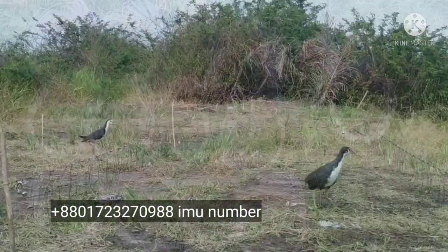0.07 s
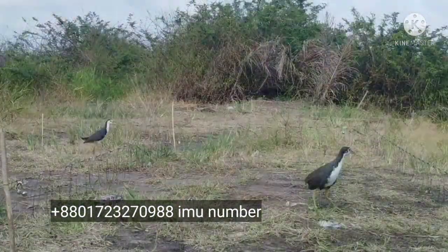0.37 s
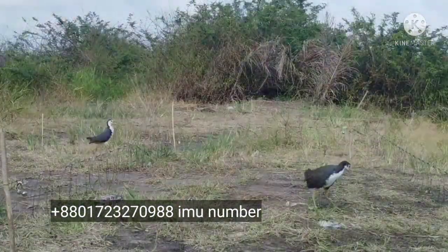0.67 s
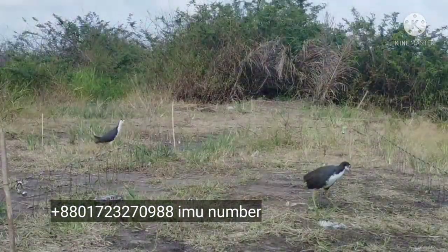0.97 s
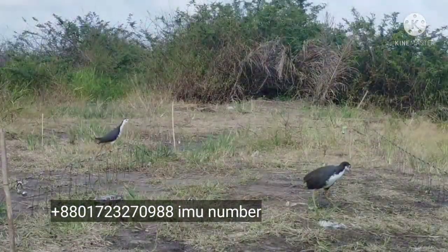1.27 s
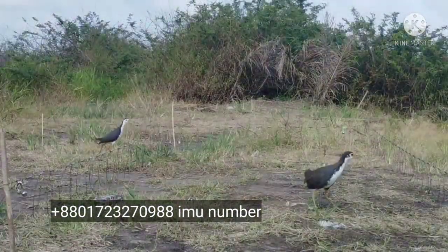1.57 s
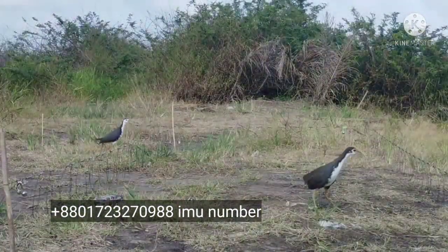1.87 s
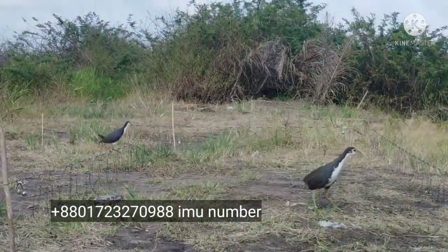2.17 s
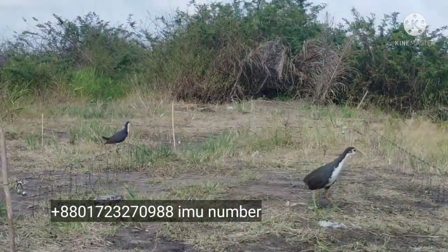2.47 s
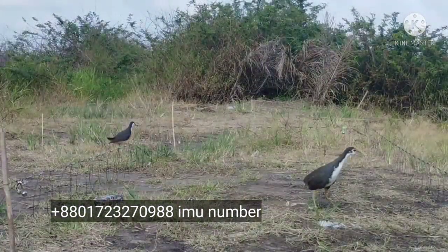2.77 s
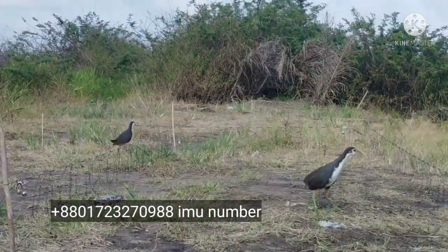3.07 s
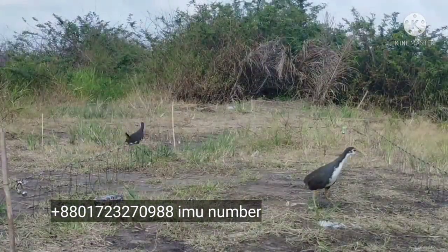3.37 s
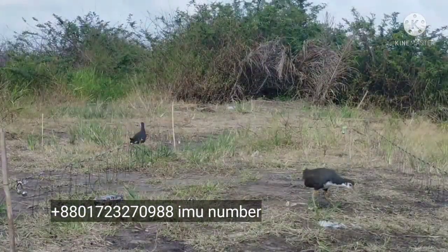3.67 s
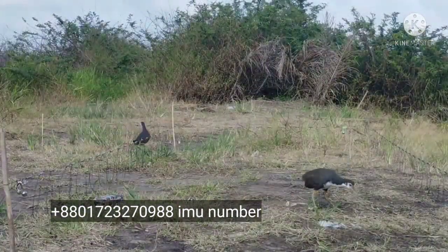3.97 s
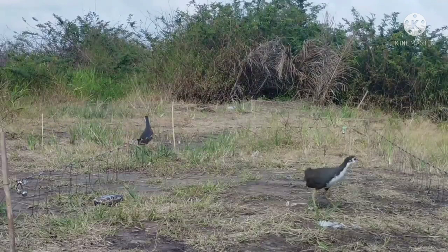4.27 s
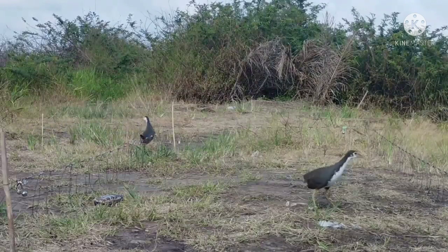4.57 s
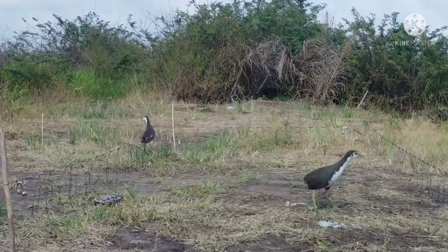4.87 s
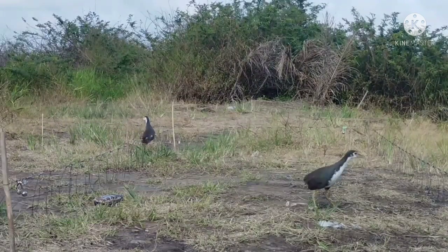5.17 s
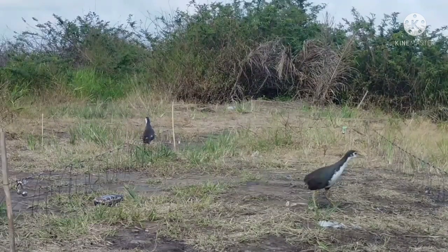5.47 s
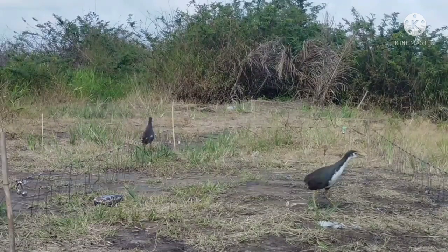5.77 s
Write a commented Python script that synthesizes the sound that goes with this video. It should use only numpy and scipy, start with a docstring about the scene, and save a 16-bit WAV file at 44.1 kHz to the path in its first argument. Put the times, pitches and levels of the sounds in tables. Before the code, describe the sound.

Harsh, distorted waterhen calls repeat evenly, mixed with runs of short croaks, soft answering notes and a faint outdoor hiss.

```python
"""Waterhen in a grassy field.

A near-pure lure call, played over and over through a loudspeaker, starts hoarse, sweeps up and repeats evenly,
so loud that it overloads the microphone; bushes and grass echo it. Runs of short croaks, pulses and breath
ringing in the throat, and a few soft answering calls fall between the notes. Small birds whistle far off, over
a faint hiss and a low rumble of wind. A dull rustle sets in near the end."""
import sys
import numpy as np
from scipy import signal
from scipy.fft import rfft, irfft
from scipy.io import wavfile

SR = 44100
rng = np.random.default_rng(int(sys.argv[2]) if len(sys.argv) > 2 else 0)


def unload_wav(signal):
    """Save mono or channel-first audio to the path in sys.argv[1] as 16-bit WAV at rate SR, clipped to [-1, 1]."""
    wavfile.write(
        sys.argv[1],
        SR,
        np.round(np.clip(np.atleast_2d(signal).T, -1, 1) * 32767).astype(np.int16),
    )


N = 264688


def from_db(db):
    return 10 ** (np.asarray(db) / 20)


def unit_rms(x):
    return x / np.sqrt(np.mean(x ** 2) + 1e-20)


def ramp(t, length):
    """Linear rise from 0 to 1, then hold."""
    return np.clip(t / length, 0, 1)


def arch(t, length):
    """Half-sine swell and fade."""
    return np.sin(np.pi * ramp(t, length))


def between(share, start, end):
    return start + share * (end - start)


def phase_of(hz):
    return 2 * np.pi * np.cumsum(hz) / SR


def add(out, start_s, sound):
    i = int(np.clip(round(start_s * SR), 0, N))
    out[i:i + len(sound)] += sound[:N - i]


def low_pass(x, hz, order=2):
    return signal.sosfilt(signal.butter(order, hz, fs=SR, output="sos"), x)


def resonance(x, hz, width_hz):
    """Two-pole band-pass, peak gain 1."""
    r = np.exp(-np.pi * width_hz / SR)
    feedback = [1, -2 * r * np.cos(2 * np.pi * hz / SR), r * r]
    return signal.lfilter(np.array([1, 0, -1]) * (1 - r * r) / 2, feedback, x)


def noise(spectrum, size):
    """Unit-RMS noise shaped by (Hz, dB) rows."""
    hz, db = np.transpose(spectrum)
    bins_hz = np.maximum(np.fft.rfftfreq(size, 1 / SR), 1)
    gain = from_db(np.interp(np.log(bins_hz), np.log(hz), db))
    return unit_rms(irfft(rfft(rng.standard_normal(size)) * gain, size))


def wobble(hz, size):
    """Unit-RMS random wavering, low-passed at hz."""
    return unit_rms(low_pass(rng.standard_normal(size + SR // 4), hz)[SR // 4:])


def puff(hz, width_hz, size):
    """Air rushing through one resonance, treble cut, unit RMS."""
    ringing = resonance(resonance(rng.standard_normal(size), hz, width_hz), hz, width_hz)
    return unit_rms(low_pass(ringing, hz + width_hz, order=4))


def field_hiss(t):
    """Faint broadband hiss, drifting in level."""
    # Each row: frequency in Hz, relative density in dB.
    spectrum = [(100, -50), (200, -55), (275, -4), (340, -19.5), (480, -10), (700, -0.5), (1000, -9),
                (1300, -10), (1600, -7), (2200, -14.5), (3000, -18), (4200, -19), (5500, -22.5),
                (7400, -29.5), (9000, -24), (11000, -30.5), (13000, -33), (15500, -58)]
    # Each row: time in seconds, level in dB.
    levels = [(.08, -75), (.28, -59.5), (.45, -67), (1.0, -51.5), (2.4, -52.5), (3.2, -45), (4.5, -52.5),
              (6, -50.5)]
    return from_db(np.interp(t, *np.transpose(levels))) * noise(spectrum, N)


def wind(t, gust_db=4.5, gust_hz=12.3):
    """Low, gusty rumble."""
    # Each row: frequency in Hz, relative density in dB.
    spectrum = [(15, -8), (30, 15), (50, -5.5), (75, -9), (110, -12), (150, -18.5), (250, -36.5)]
    # Each row: time in seconds, level before gusts in dB.
    levels = [(0, -66), (.75, -50), (1.2, -58), (2.62, -48.5), (2.85, -58.5), (5.6, -63), (5.8, -48.5),
              (6, -39)]
    db = np.interp(t, *np.transpose(levels)) + gust_db * wobble(gust_hz, N)
    return from_db(db) * noise(spectrum, N)


def sliding_hiss(half_width_hz=420):
    """Narrow hisses swell and sink in pitch."""
    # Each row: start in seconds, length in seconds, first and last centre in Hz, peak level in dB.
    slides = [(0.106, 0.34, 3400, 3070, -63), (0.371, 0.33, 2180, 1680, -61),
              (0.504, 0.48, 3640, 1967, -54), (1.108, 0.43, 2484, 1870, -54), (1.593, .42, 2685, 2070, -52),
              (2.009, 1, 2230, 1853, -58)]
    out, t = np.zeros(N), np.arange(SR) / SR
    for start_s, length_s, first_hz, last_hz, db in slides:
        phase = phase_of(np.interp(t, [0, length_s], [first_hz, last_hz]))
        hiss = wobble(half_width_hz, SR) * np.sin(phase) + wobble(half_width_hz, SR) * np.cos(phase)
        add(out, start_s, from_db(db) * arch(t, length_s) * hiss)
    return out


def undertone(phase, upper_db):
    """Unequal alternate cycles put lines at 1/2 and 3/2 of the pitch."""
    return np.sin(phase / 2) + from_db(upper_db) * np.sin(1.5 * phase)


def answers(first_hz=854, second_hz=1112, jitter=0.025):
    """Soft calls: a throaty pop, a held pitch, then a step up that breaks to the octave below."""
    # Each row: start in seconds, level in dB.
    notes = [(.264, -43.5), (.733, -36), (1.288, -35.5), (1.835, -35.5), (3.999, -37), (5.089, -37)]
    length_s, attack_s, release_s, pop_s = 0.1, 0.0044, 0.01, 0.01
    step_at_s, step_s, step_db = 0.036, 0.0184, -2.5
    out, t = np.zeros(N), np.arange(SR // 8) / SR
    step = ramp(t - step_at_s, step_s)
    envelope = ramp(t, attack_s) * ramp(length_s - t, release_s) * from_db(step_db * step)
    for start_s, db in notes:
        phase = phase_of(between(step, first_hz, second_hz) * (1 + jitter * wobble(247, len(t))))
        tone = np.sin(phase) + step * undertone(phase, upper_db=-11)
        pop = from_db(-2) * np.exp(-t / pop_s) * puff(hz=650, width_hz=500, size=len(t))
        add(out, start_s, from_db(db) * envelope * (tone + pop))
    return out


def lingering_note(start_s=0.854, hz=990, level_db=-33, attack_s=0.011, decay_db_per_s=105):
    """A thin, fluttering tone dies away before the first loud call."""
    out, t = np.zeros(N), np.arange(SR // 3) / SR
    db = level_db - decay_db_per_s * t + 3 * wobble(41, len(t))
    phase = phase_of(hz * (1 + 0.024 * wobble(60, len(t))))
    add(out, start_s, from_db(db) * ramp(t, attack_s) * np.sin(phase))
    return out


def loud_calls(first_s=1.0911, period_s=0.43378, count=11):
    """One note, repeated: it starts low and hoarse, sweeps up, clears, sags and leaves a short ring."""
    # Each row: multiple of the pitch, level re the fundamental in dB.
    overtones = [(2, -23.5), (3, -26), (4, -28.5)]
    # Each row: frequency in Hz, relative density in dB.
    rasp_spectrum = [(100, -14.5), (400, -5), (750, 8), (1300, 10), (1800, -23), (2700, 4), (4000, -10.5),
                     (6000, -16.5), (15000, -30)]
    attack_s, settle_s, hold_s, ease_s, release_s = 0.001938, 0.00693, 0.096, 0.012, 0.0037
    rise_at_s, rise_s, swell_s = 0.0305, 0.04508, 0.018
    rattle_s, rattle_hz, doubling_at_s, doubling_width_s = 0.029, 179.7, 0.0572, 0.011
    size = SR // 5
    t = np.arange(size) / SR - attack_s
    since_s = np.maximum(t, 0)
    push = np.exp(-since_s / settle_s)
    hoarse = (1 - ramp(t - rise_at_s, rise_s)) ** 1.893
    doubling = np.exp(-((t - doubling_at_s) / doubling_width_s) ** 2)   # brief period doubling
    # Each catch of the throat pulls pitch and level down.
    catches = arch(t, rattle_s) * np.cos(np.pi * rattle_hz * (t - rattle_s / 2)) ** 8

    low_hz, top_hz, push_hz, catch_hz, sag_hz_per_s, jitter = 683.7, 1014.5, 124.7, 70.8, 2890, 0.028
    hz = between(hoarse, top_hz, low_hz) + push_hz * push - catch_hz * catches
    hz -= sag_hz_per_s * np.maximum(t - rise_at_s - rise_s, 0)
    phase = phase_of(hz * (1 + jitter * hoarse * wobble(200, size)))
    tone = np.sin(phase) + sum(from_db(db) * np.sin(k * phase) for k, db in overtones)
    tone += from_db(-6.5) * doubling * undertone(phase, upper_db=-3)

    level_db = between(ramp(t - rise_at_s, swell_s), -5.5, 6.5) + 7 * push - 8 * catches - 7 * doubling
    level_db -= 10 * ramp(t - hold_s + ease_s, ease_s)
    level_db += 1.5 * hoarse * wobble(230, size)
    gate = ramp(t + attack_s, 2 * attack_s) ** 3 * (1 - ramp(t - hold_s, release_s))
    rasp_gain = from_db(between(hoarse, -26, -15.5)) + from_db(-8) * np.exp(-since_s / 0.00097)
    call = from_db(level_db) * gate * (tone + rasp_gain * noise(rasp_spectrum, size))

    ring_hz, decay_db_per_s = 983.9, 566
    after_s = np.maximum(t - hold_s - release_s / 2, 0)
    ring_db = -5.5 - decay_db_per_s * after_s + 2 * wobble(150, size)
    ring = np.sin(phase_of(ring_hz * (1 + 0.015 * wobble(145, size))))
    ring += from_db(-23) * noise(rasp_spectrum, size)
    call += from_db(ring_db) * ramp(after_s, release_s) * ring

    out = np.zeros(N)
    for k in range(count):
        add(out, first_s + k * period_s - attack_s, call)
    return out


def bushes(x, top_hz=2200):
    """A few separate dull echoes."""
    # Each row: delay in seconds, gain in dB.
    echoes = [(0.0513, -26), (.085, -33), (.138, -60), (.172, -43.5), (.235, -58), (.30, -82)]
    out, dull = np.zeros(N), low_pass(x, top_hz)
    for delay_s, db in echoes:
        add(out, delay_s, from_db(db) * dull)
    return out


def scatter(x, gain_db, t60_s, top_hz, build_s=0.0058):
    """Grass and leaves return a dense, dying tail."""
    t = np.arange(SR) / SR
    tail = low_pass(rng.standard_normal(SR), top_hz) * from_db(-60 * t / t60_s) * ramp(t, build_s)
    return from_db(gain_db) * signal.fftconvolve(x, tail / np.linalg.norm(tail))[:N]


def across_field(calls, leaf_hz=3900, leaf_width_hz=900):
    """Each call's clear top carries and lingers; its fourth harmonic rings on briefly."""
    carried = resonance(calls, hz=1000, width_hz=260)
    bright = resonance(resonance(calls, leaf_hz, leaf_width_hz), leaf_hz, leaf_width_hz)
    out = calls + bushes(carried) + scatter(carried, gain_db=-37, t60_s=0.72, top_hz=3050)
    out += scatter(bright, gain_db=-15, t60_s=0.22, top_hz=6000)
    treble = out - low_pass(out, 3500)
    return out + scatter(treble, gain_db=-31, t60_s=0.16, top_hz=14000)   # splash off the grass


def croaks(easy_hz=656, strained_hz=735, jitter=0.13, shimmer=0.76, breath=0.86, rasp_top_hz=5600):
    """A snap, then a rising note: unsteady tone, pulses and gated air ringing in the throat, a grunt."""
    # Each row: start in seconds, length in seconds, then tone, octave and rasp levels in dB.
    notes = [(2.552, .018, -28.5, -34.5, -41.5), (2.601, 0.022, -25, -30.5, -35.5),
             (2.662, 0.016, -23, -31, -36.5), (2.744, .026, -27.5, -30, -31.5),
             (2.918, .018, -23, -23, -14.5), (2.996, 0.023, -24, -27, -13), (3.077, .016, -22, -19, -12),
             (3.165, 0.0223, -24, -24, -12), (3.237, 0.019, -24, -19.5, -12.5),
             (3.402, .012, -22.5, -23, -12.5), (3.5028, 0.028, -23, -26, -18.5),
             (3.572, .029, -22.5, -26.5, -23), (3.919, 0.025, -30.5, -36.5, -42),
             (5.25, 0.032, -18, -49, -70), (5.309, 0.034, -19.5, -44, -70), (5.37, 0.036, -20.5, -49, -71),
             (5.67, 0.028, -35, -32, -48.5), (5.719, 0.0254, -27, -22, -57),
             (5.781, 0.0262, -28, -23.5, -68), (5.8702, 0.0219, -8, -19.5, -35),
             (5.934, 0.026, -6.5, -18, -30), (5.998, 0.042, 0.5, -9, -20.5)]
    # Throat resonances. Each row: centre in Hz, width in Hz, relative gain in dB.
    throat = [(933, 1300, -5), (1430, 530, 1), (2440, 470, -4.5), (3040, 200, 6.5), (3840, 310, -5),
              (4270, 170, -7.5), (5490, 130, -10.5)]
    size = SR // 12
    out, t = np.zeros(N), np.arange(size) / SR
    for start_s, length_s, tone_db, octave_db, rasp_db in notes:
        progress = t / length_s
        snap = from_db(3.5) * ramp(progress, 0.072) * np.exp(-(progress / 0.3) ** 2)
        envelope = snap + arch(progress - 0.28, 0.77)
        # Raspy croaks are higher, loud ones rougher.
        loud_db = max(tone_db, octave_db, rasp_db)
        rough = np.interp(loud_db, [-21.5, -10], [0.3, 0.73])
        base_hz = np.interp(rasp_db, [-42, -11], [easy_hz, strained_hz])
        pitch_hz = base_hz * (1 + 0.34 * abs(progress - 0.19))
        phase = phase_of(pitch_hz * (1 + jitter * rough * wobble(500, size)))
        tone = from_db(tone_db) * np.sin(phase) + from_db(octave_db) * np.sin(2 * phase)
        tone *= 1 + shimmer * rough * wobble(155, size)

        pulses = unit_rms(np.diff(phase // (2 * np.pi), prepend=0))
        source = pulses + breath * rough * (1 + np.cos(phase)) * rng.standard_normal(size)
        ringing = sum((-1) ** k * from_db(db) * resonance(source, hz, width_hz)
                      for k, (hz, width_hz, db) in enumerate(throat))
        rasp = from_db(rasp_db) * unit_rms(low_pass(ringing, rasp_top_hz, order=6))
        grunt_db = loud_db - 10 - 1.25 * max(-1 - loud_db, 0)   # heard only in the loudest croaks
        grunt = from_db(grunt_db) * puff(hz=235, width_hz=170, size=size)
        air = from_db(tone_db - 7) * rough * puff(hz=850, width_hz=750, size=size)
        add(out, start_s, envelope * (tone + air + rasp + grunt))
    return out


def among_stems(croaking):
    """Nearby stems throw back mostly the treble of the croaks."""
    crisp = resonance(croaking, hz=3500, width_hz=2200)
    near = scatter(crisp, gain_db=-10.5, t60_s=0.11, top_hz=8200)
    near += scatter(croaking, gain_db=-17, t60_s=0.15, top_hz=2960)
    return croaking + near + scatter(crisp, gain_db=-20, t60_s=1.0, top_hz=5050)


def whistles(waver=0.0029, glide_waver=0.41):
    """Thin, near-pure notes of far birds; the steep ones are buzzier."""
    # Each row: start in seconds, length in seconds, first and last pitch in Hz, peak level in dB.
    notes = [(2.591, 0.074, 6070, 6080, -52.5), (5.703, 0.058, 5130, 5130, -45.5),
             (5.707, 0.039, 5960, 5960, -52.5), (5.785, .037, 5000, 4240, -33.5),
             (5.806, .057, 6450, 6640, -54), (5.809, 0.061, 3780, 3250, -36.5),
             (5.822, .027, 7390, 7430, -50), (5.89, 0.031, 5350, 5380, -44.5)]
    out, t = np.zeros(N), np.arange(SR // 6) / SR
    for start_s, length_s, first_hz, last_hz, db in notes:
        jitter = waver + glide_waver * abs(np.log(last_hz / first_hz))
        hz = np.interp(t, [0, length_s], [first_hz, last_hz]) * (1 + jitter * wobble(400, len(t)))
        add(out, start_s, from_db(db) * arch(t, length_s) * np.sin(phase_of(hz)))
    return out


def rustle(t, start_s=5.65, attack_s=0.012, level_db=-37.5):
    """Dull noise behind the last croaks."""
    # Each row: frequency in Hz, relative density in dB.
    spectrum = [(60, 4), (150, -3.5), (250, -6.5), (400, -16.5), (800, 6), (1550, -0.5), (2200, -31),
                (4500, -13.5), (7000, -28.5), (15000, -39)]
    return from_db(level_db) * ramp(t - start_s, attack_s) * noise(spectrum, N)


def scene():
    """Birds and their echoes over hiss and wind, mono."""
    t = np.arange(N) / SR
    calls, croaking = loud_calls(), croaks()
    near_birds = across_field(calls) + among_stems(croaking)
    background = wind(t) + rustle(t) + field_hiss(t)
    faint_birds = answers() + lingering_note() + whistles()
    return (near_birds + faint_birds + background + sliding_hiss())[None]


def record(dry, ceiling=0.31, knee=9.1, cutoff_hz=15700):
    """The input overloads and flattens loud notes to near square waves; the top is cut."""
    oversampled = signal.resample_poly(dry, 4, 1, axis=-1)
    flattened = oversampled / (1 + np.abs(oversampled / ceiling) ** knee) ** (1 / knee)
    clipped = signal.resample_poly(flattened, 1, 4, axis=-1)
    return signal.fftconvolve(clipped, signal.firwin(201, cutoff_hz, fs=SR)[None], mode="same")


dry = scene()
out = record(dry)
unload_wav(out)
```